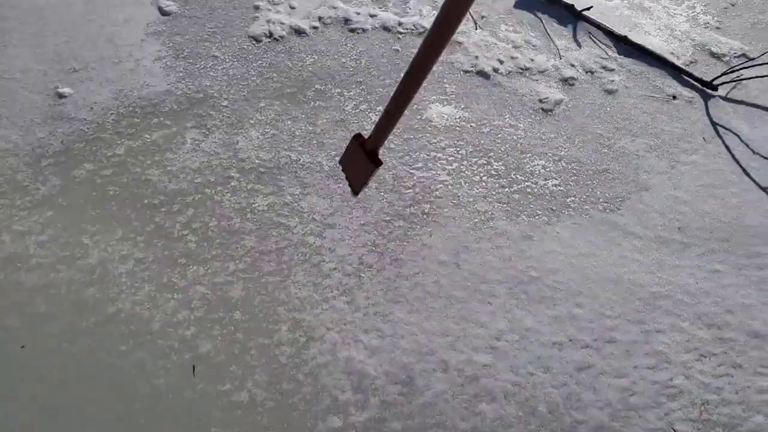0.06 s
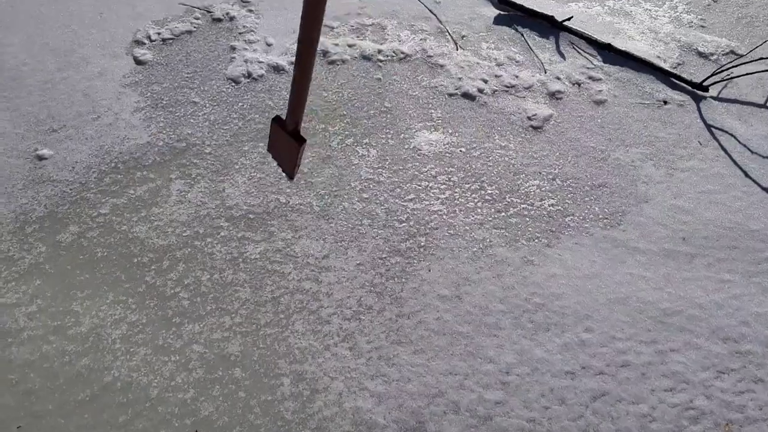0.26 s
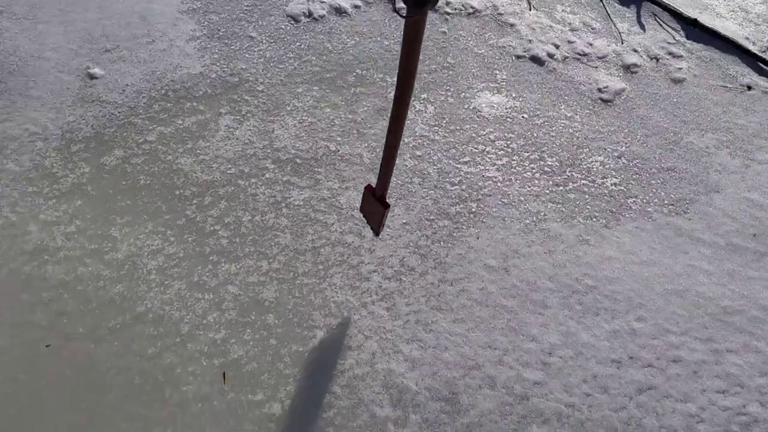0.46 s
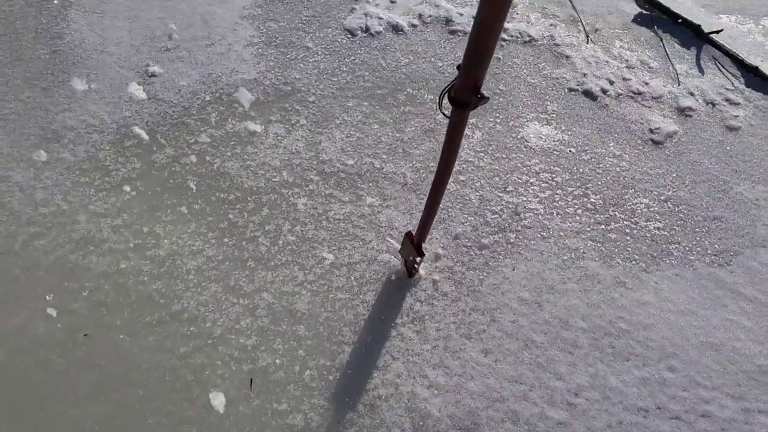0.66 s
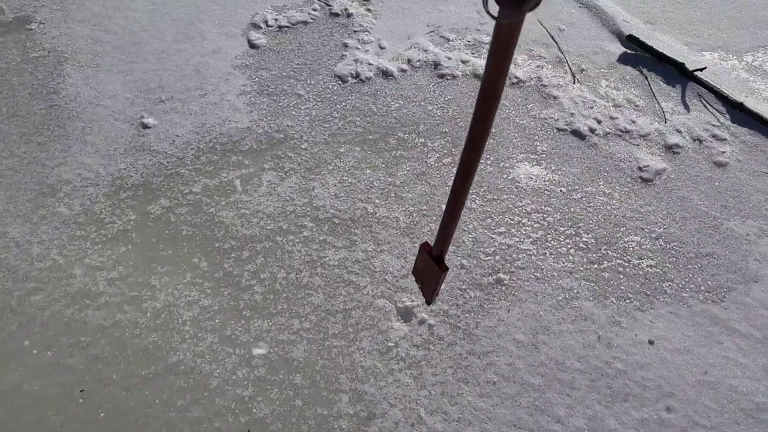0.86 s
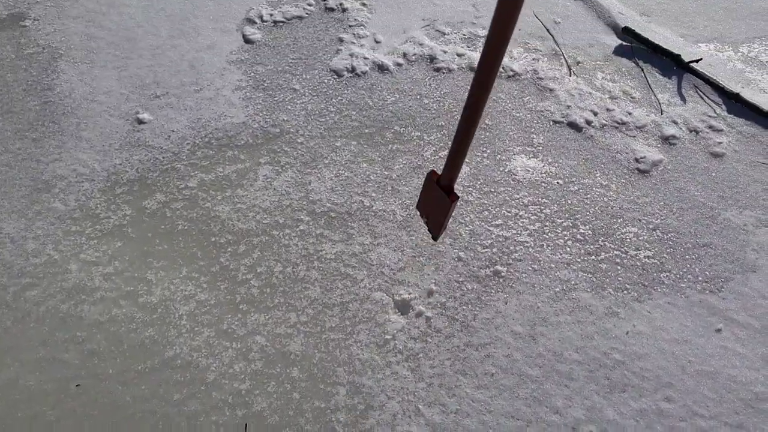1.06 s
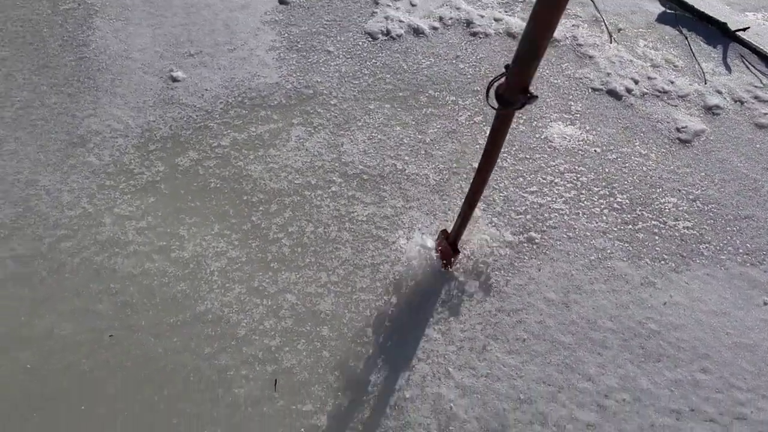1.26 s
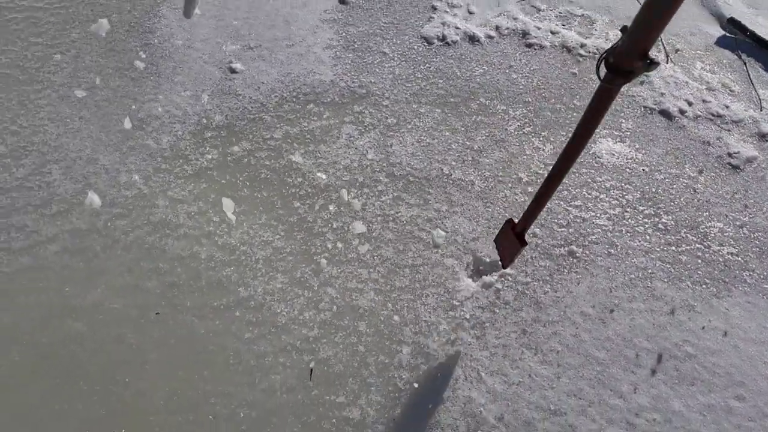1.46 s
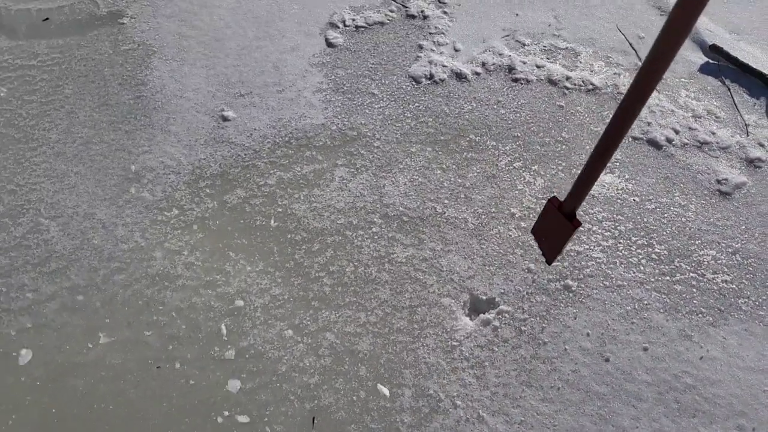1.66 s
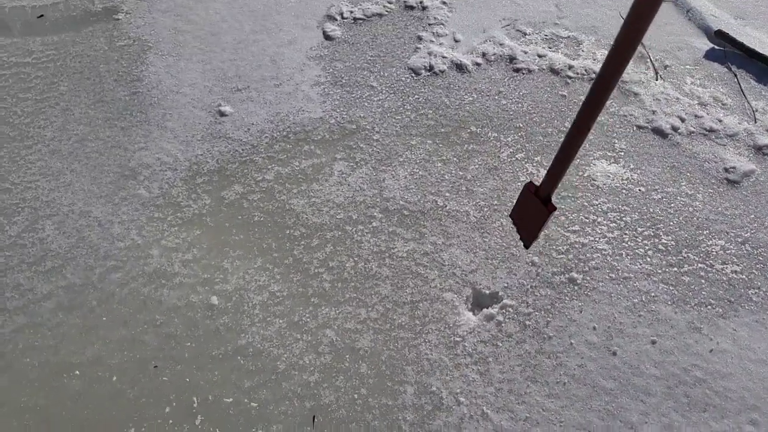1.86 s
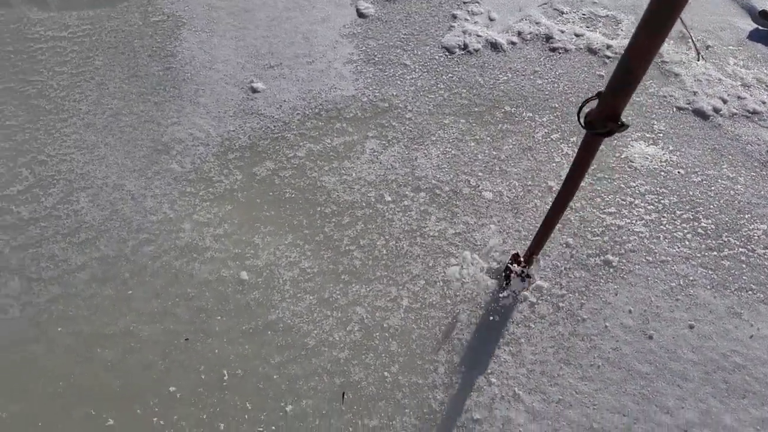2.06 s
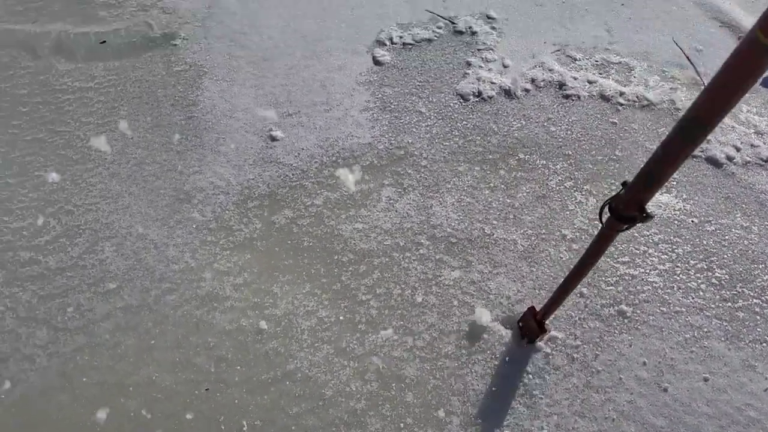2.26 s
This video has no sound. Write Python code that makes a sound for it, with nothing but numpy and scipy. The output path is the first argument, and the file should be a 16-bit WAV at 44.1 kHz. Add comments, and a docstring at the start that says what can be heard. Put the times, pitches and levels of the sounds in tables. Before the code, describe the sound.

Close outdoor chopping on ice: a brief muffled scuff and knocks, a bright clink, then three sharp metallic cracks with low thumps, each followed by crunches and glassy chips, with a distant engine droning faintly.

```python
"""A steel spud bar chops three times into solid lake ice, close to the microphone.
Each blow layers filtered grain bursts for the cracks, low sine thumps and decaying modes for the ice sheet,
and a fluttering modal ring for the bar. Chunks crunch as more grain bursts, chips clink as glassy modes and
fine crumbs patter as pulsed noise. A noise scuff and a few dull modal knocks come first; far off, an engine
of wavering harmonics drones over the filtered noise of the open air."""
import sys
import numpy as np
from scipy import signal
from scipy.fft import rfft, irfft, next_fast_len
from scipy.io import wavfile

SR = 44100
rng = np.random.default_rng(int(sys.argv[2]) if len(sys.argv) > 2 else 0)


def to_wav(s):
    """Save 16-bit WAV."""
    ch = np.atleast_2d(s).T  # columns
    pcm = np.round(np.clip(ch, -1, 1) * 32767)  # PCM
    wavfile.write(sys.argv[1], SR, pcm.astype(np.int16))


N = 101429

# In every table, levels are relative mix levels, t60 is the time to fall 60 dB,
# and pan is the level of left over right.

# Open-air rumble and hiss. Each row: frequency in Hz, density in dB per Hz.
AIR_COLOUR = [(25, 6), (60, 23.5), (140, 17.5), (250, 7.5), (600, 2.5), (1500, -5.5), (4000, -13.5),
              (9500, -22), (15000, -17)]
# Swell of the open air. Each row: time in seconds, level in dB.
AIR_LEVEL = [(0, -34), (.06, -53.5), (.2, -40), (.4, -42.5), (.75, -42), (.95, -49.5), (1.5, -43.5),
             (1.75, -48.5), (2.3, -50.5)]
# Cycle rate of the distant three-cylinder engine. Each row: time in seconds, rate in Hz.
ENGINE_RATE = [(0, 25), (.12, 26.5), (.4, 24.5), (.7, 19.5), (1, 19), (1.3, 22), (2.3, 19)]
# Swell of the engine. Each row: time in seconds, level in dB.
ENGINE_LEVEL = [(0, -39.5), (.25, -41), (.45, -48.5), (.75, -54.5), (.92, -49), (1.1, -45), (1.55, -49),
                (1.7, -57), (1.85, -45), (2.3, -55)]
# Engine harmonics. Each row: multiple of the cycle rate, mean level in dB.
ENGINE_HARMONICS = [(2, -23.5), (3, -2.5), (4, -23.5), (5, -13), (6, -8.5), (7, -26), (9, -36), (13, -48)]

# A scuff on snow. Each row: start in seconds, hold in seconds, level in dB.
SCUFFS = [(.030, 0.019, -30.5), (0.037, 0.0035, -20.5), (0.058, 0.055, -33.5), (0.15, 0.0059, -41)]
# Muffled tone of the scuff. Each row: frequency in Hz, density in dB per Hz.
SCUFF_COLOUR = [(60, 6), (330, -7.5), (530, 6), (880, -8), (1200, -22), (2100, -19.5), (4000, -36.5),
                (16000, -38)]
# Dull knocks close to the microphone. Each row: start in seconds, level in dB.
KNOCKS = [(0.2163, -7), (0.2305, -16), (0.2444, -6)]
# Modes of a knock before its low-pass. Each row: frequency in Hz, level in dB, t60 in seconds.
KNOCK_MODES = [(620, 0.73, 0.0093), (1085, 0.0065, 0.0078)]

# Small chips clink on the ice. Each row: start in seconds, level in dB, pitch factor set by size, pan in dB.
CHIPS = [(.299, -38.5, 0.5, 0), (.331, -48, .6, 0), (.360, -38, 0.77, -3), (0.4367, -11.5, 1, -3),
         (0.4587, -16.5, 1, -9.5), (0.4725, -31.5, 1, 20), (0.4882, -23, 1.8, -11), (0.513, -21.5, 1.5, 0),
         (.609, -36, 1.3, 0), (0.6696, -24, 1, 4), (1.0245, -23.5, 0.59, 3.5), (1.093, -28, 0.61, 0.5),
         (1.3865, -20.5, 1.04, -12.5), (1.498, -44, 1.5, 4), (1.5327, -44.5, 1.5, 20.5),
         (1.574, -47, 1.7, -1), (1.625, -50, 1.25, -6), (1.767, -44, 0.71, 10), (1.778, -32, 0.69, 3.5),
         (1.804, -42.5, 0.93, 5), (1.9444, -19.5, 1.25, -5), (2.081, -23, 2.1, -2), (2.165, -46.5, 1, 2),
         (2.212, -43.5, 0.84, 6)]
# Modes of a chip at pitch factor 1. Each row: frequency in Hz, level in dB, t60 in seconds.
CHIP_MODES = [(7210, -13.5, 0.046), (8160, -1, 0.016), (10340, -5, 0.023), (10370, -14, 0.0052),
              (12800, -6.5, 0.0067), (14300, -51.5, 0.021)]
# Modes of one thin shard. Each row: frequency in Hz, level in dB, t60 in seconds.
SHARD_MODES = [(2240, -14.5, 0.13), (4890, -18, 0.042), (5460, -44, .03), (7340, -11, 0.052),
               (9600, -19, .015), (10960, -20, 0.042), (14500, 7.5, 0.0097), (15400, -10, 0.012)]
# Crisp tick of a landing chip. Each row: frequency in Hz, density in dB per Hz.
TICK_COLOUR = [(200, -23.5), (1200, -8), (3000, -7.5), (4500, -5.5), (8000, -7), (16000, -1.5)]

# Three blows and one rebound ring the sheet and throw fine spray.
# Each row: time in seconds, sheet ring in dB, spray level in dB, spray t60 in seconds.
BLOWS = [(.527, -22, -39, 0.76), (1.256, -29, -32.5, 0.52), (1.386, -35.5, -43, 0.89),
         (1.973, -23.5, -42, 0.87)]
# Tone of the falling crumbs. Each row: frequency in Hz, density in dB per Hz.
SPRAY_COLOUR = [(100, -5), (500, 3), (1100, 8), (2500, 5), (5000, 0.5), (9500, -6.5), (13500, -3.5),
                (16000, -8)]
# The ice sheet gives under the blade. Each row: start in seconds, pitch in Hz, level in dB, t60 in seconds.
THUMPS = [(0.5306, 157, -6, 0.009), (0.538, 67, -14.5, 0.042), (1.256, 210, -20, 0.077),
          (1.272, 106, -29.5, 0.18), (1.9713, 97.2, -8, 0.033), (1.982, 61, -11.5, 0.046)]
# Modes of the ice sheet. Each row: frequency in Hz, level in dB, t60 in seconds.
SHEET_MODES = [(277, -1, .13), (323, 3.5, 0.03), (447, 1.5, 0.11), (468.8, -6.5, 0.22)]

# Loose chunks crunch and land. Each row: start in seconds, hold in seconds, level in dB,
# low mids, presence and treble in dB, resonance of the chunk in Hz, pan in dB.
CHUNKS = [(0.4275, 0.021, -40.5, -0.5, 0.0, 1, 3170, 2.5), (0.5945, 0.0021, -28.5, -4.5, -2, -10, 4500, -9),
          (0.614, 0.0037, -36, -11, -5, -4.0, 4130, -12), (0.6175, 0.001, -14.5, -14, -6, -8, 3450, 3),
          (0.637, 0.0014, -29.5, 11, -11, -8.0, 3000, 0), (0.649, 0.0082, -33.5, -36, -5, 7, 6370.0, 1.5),
          (0.699, 0.0034, -41, -3, -13, -14, 3280, 3), (0.781, 0.0017, -32, -10.5, -25, -12, 3140, -0.5),
          (0.792, 0.0079, -42, 4.5, -0.5, -2, 3900, -2), (1.115, 0.0025, -49.5, 8.5, 5, 20, 8100, -7.5),
          (1.1348, 0.0051, -25, -5.5, -0.5, 9, 5500, 0), (1.204, 0.0018, -42, 6, -3.0, 12, 2720, -4.0),
          (1.2379, 0.0036, -30.0, -6.0, 1, -1, 4730, 0), (1.2985, 0.0011, -35, 4, -12, -14, 2370, -8),
          (1.311, 0.0059, -17, -5.0, 1.0, 11.5, 4200, -2), (1.3161, 0.0011, -21.5, -14, -20, 4, 3600, -1),
          (1.338, 0.007, -29.5, 3, 14, 16.5, 4200, 4), (1.383, 0.012, -20.5, 1.5, -2, 15, 3250, -1.5),
          (1.392, 0.0031, -20.0, 9.5, 16.5, 1.0, 4800, -0.5),
          (1.407, 0.013, -30.5, -0.0, -1, -14, 4400, -4), (1.439, 0.014, -39.5, -1, 1.5, -31, 3340, -1.5),
          (1.507, 0.0028, -41.5, 7, -8, 9, 2270, -4.0), (1.5358, 0.0011, -30.5, 7.5, 3.5, -28, 4120, 7.5),
          (1.561, 0.01, -46.0, 8, -4.0, 2, 2320, -5), (1.835, 0.005, -31.5, 0.5, 3.5, 13.5, 5310, 0.5),
          (1.906, 0.027, -43, 9, -2, 7, 3150, 1), (2.006, 0.0017, -34, -11, -13, -12, 2300, -2.0),
          (2.025, 0.018, -41.5, 8, 14, 17, 3470, 16), (2.0318, 0.0046, -31.5, 5, 5.5, 13, 3600, -10),
          (2.057, 0.0024, -26, 2, 9, 5, 5160.0, 1.5), (2.113, 0.0018, -35.5, -2, 9.5, 26.5, 7000, -15.5),
          (2.119, 0.0015, -38, -32, 9, 18, 6900.0, 4), (2.13, 0.013, -52.5, -1, 14, 21, 7860, 6),
          (2.188, 0.0025, -45, -14, 0.0, 15.5, 3300, -1.0), (2.245, 0.0077, -48, -2.5, 2.5, 12, 7080, -3.5)]
# Base tone of a chunk. Each row: frequency in Hz, density in dB per Hz.
CHUNK_COLOUR = [(100, -13.5), (450, -2), (1400, -0.5), (2400, -1), (4500, 0.5), (7500, -3.5), (9500, -22.5),
                (13000, -16), (16000, -16.5)]
# The blade cracks the ice. Each row: start in seconds, hold in seconds, level in dB,
# low mids, presence and treble in dB, resonance of the broken piece in Hz, pan in dB.
CRACKS = [(0.52, 0.0051, -28, 4, -3, 4.5, 2360, -16), (0.5232, 0.0018, -10, -8.5, -6.5, -3, 2400, -1.5),
          (0.5422, 0.0033, -13.5, 8.5, 15.5, 9.5, 3000, 0.5),
          (0.546, 0.00071, -13.5, -7, -4, 3.0, 2950, -3), (0.56, 0.0033, -24, -0.5, 6, 0, 6250, 4.5),
          (1.25, 0.0013, -59, 19, -40, -38, 3430, -18), (1.2522, 0.0052, -12.5, -6, -1.5, -1, 3440, 3.5),
          (1.2585, 0.0074, -21.5, 13, -3, 17.5, 4630, -7.5),
          (1.2715, 0.0018, -12, 0.5, 5.5, 3.0, 6770, 0.5), (1.2767, 0.004, -34, 9, 7.5, 2, 7600, 11),
          (1.947, 0.012, -27.5, -14, -7.5, -3, 2030, 6.5), (1.9631, 0.0025, -16, -13, -9, -3, 1977, -6),
          (1.9684, 0.0022, -12.5, 1.5, -0.5, 4, 3060, 1), (1.983, 0.0045, -23.5, 19, 17.5, 16, 3130.0, -2)]
# Base tone of a crack. Each row: frequency in Hz, density in dB per Hz.
CRACK_COLOUR = [(100, 8), (400, -6.5), (1500, -3.5), (2300, -4.5), (3300, -6.5), (4500, -7), (7000, -7.5),
                (9500, -23), (13000, -14.5), (16000, -23)]
# Modes of the steel bar. Each row: frequency in Hz, level in dB, t60 in seconds.
BAR_MODES = [(631.3, -0.5, 0.4), (928, 10, 0.13), (1070, -4, 0.13), (1247, 4.5, 0.23), (1593, -4, 0.31),
             (1838, -7.5, 0.15), (2068, -0.5, .16), (2400, 2, 0.11), (2985, -15.5, 0.38), (2940, -14, 0.05),
             (3336, 4.5, 0.094), (3940, -7.5, 0.18), (4620, -12.5, 0.21), (5980, -9, .15), (6560, -11, .13),
             (6660, -10.5, .13)]
# Tone of the scatter through the ice. Each row: frequency in Hz, density in dB per Hz.
TAIL_COLOUR = [(60, 0.5), (250, 1), (1000, -4), (2500, 2.5), (6000, -8.5), (16000, -0.5)]

T = np.arange(N) / SR
SHORT = T[:8192]  # time axis of one event, in seconds
ATTACK_S, FRACTURE_ATTACK_S, KNOCK_ATTACK_S = 0.00044, 0.00055, 0.0018
CRACK_T60_S, CHUNK_T60_S, SCUFF_T60_S, CHIP_T60_S = 0.027, 0.0095, 0.068, 0.028
GRAIN_DB, SPRAY_GRAIN_DB = 7.5, 4  # spread of grain strengths
SHARD_S, SHARD_DB, CHIP_CRACK_DB = .2645, -16, -4.5
PIECE_DB, PIECE_WIDTH_HZ, FRACTURE_LIFT_DB = 10.5, 73, 0.5
BAR_DB, CHUNK_BAR_DB, TAIL_DB, TAIL_T60_S = -18.5, -13.5, -4, 0.078
CHATTER, CHATTER_HZ = 1.3, 110  # depth of the bar's flutter, random points per second
SPRAY_DELAY_S, CRUMBS_PER_S, CRUMB_SPREAD_DB = 0.011, 83, 4.5
CRUMB_S = 0.00064  # time constant of a crumb's power
PORT_LAG_S = .00009
APART_HZ, APART_SHARE, BASS_APART_SHARE = 1440, 0.7, 0.28  # stereo width of the grains
MODE_APART_HZ = 7000  # scales the phase spread of modes between the ports
KNOCK_TOP_HZ, RUMBLE_CUT_HZ, TOP_HZ = 1294, 30, 15900


def undb(db):
    """Decibels to gain."""
    return 10 ** (np.asarray(db) / 20)


def unit(x):
    """Scale to an rms of 1."""
    return x / np.sqrt(np.mean(x ** 2))


def fade(t, t60):
    """Exponential decay that starts at t = 0."""
    return np.exp(-np.log(1000) * np.maximum(t, 0) / t60)


def rise(attack):
    """Straight fade-in of a short event."""
    return np.minimum(SHORT / attack, 1)


def add(out, start, x, pan_db=0):
    """Mix a sound in at its time and side."""
    i = int(start * SR)
    sides = undb(np.array([[pan_db], [-pan_db]]) / 2)
    out[:, i:i + x.shape[-1]] += (x * sides)[:, :N - i]


def colour(x, points):
    """Causal minimum-phase filter of unit power through (Hz, dB) points."""
    n = 2 * next_fast_len(x.shape[-1])
    octave = np.log2(np.maximum(np.arange(n // 2 + 1) * SR / n, 1))
    hz, db = np.array(points).T
    gain = unit(undb(np.interp(octave, np.log2(hz), db)))
    # Folding the cepstrum forward puts the energy as early as possible.
    cepstrum = irfft(np.log(gain))
    cepstrum[1:n // 2] *= 2
    cepstrum[n // 2 + 1:] = 0
    return irfft(rfft(x, n) * np.exp(rfft(cepstrum)))[..., :x.shape[-1]]


def grains(size, spread_db):
    """Dense clicks of uneven strength at two ports: alike in the bass, partly unrelated in the treble."""
    strength = undb(spread_db * np.clip(rng.standard_normal(size), -3, 3))
    common, apart = rng.standard_normal((2, size)) * strength
    highpass = signal.butter(2, APART_HZ, "high", fs=SR, output="sos")
    apart = BASS_APART_SHARE * apart + APART_SHARE * signal.sosfilt(highpass, apart)
    return unit(np.array([common + apart, common - apart]))


def burst(length, t60, attack):
    """A run of tiny clicks that rises, holds until its length is up, then dies away."""
    return grains(len(SHORT), GRAIN_DB) * rise(attack) * fade(SHORT - length, t60)


def ring(modes, t, factor=1):
    """Decaying modes that start together; the higher ones differ more in phase between the ports."""
    offsets = rng.standard_normal((len(modes), 1, 1)) * np.array([[1], [-1]])
    total = 0
    for (hz, db, t60), offset in zip(modes, offsets):
        pitch = hz * factor
        phase = offset * min(hz / MODE_APART_HZ, .5)
        audible = pitch < SR / 2
        total = total + undb(db) * audible * fade(t, t60) * np.cos(2 * np.pi * pitch * t + phase)
    return total


def through(x, response):
    """Pass a sound through a response of unit energy."""
    response = unit(response) / np.sqrt(response.shape[-1])
    return signal.fftconvolve(x, response, axes=-1)[:, :N]


def curve(rows):
    """Straight lines through (seconds, value) points."""
    return np.interp(T, *np.array(rows).T)


def waver():
    """Slow random drift."""
    return np.interp(T, np.linspace(0, T[-1], 40), rng.standard_normal(40))


def far_engine():
    """Harmonics of the cycle rate, each wavering a little in level and phase, drone unevenly."""
    phase = 2 * np.pi * np.cumsum(curve(ENGINE_RATE)) / SR
    engine = np.zeros(N)
    for multiple, db in ENGINE_HARMONICS:
        level = undb(db + 0.83 * waver())
        engine += level * np.sin(round(multiple) * phase + 0.1 * waver())
    return unit(engine) * undb(curve(ENGINE_LEVEL))


def open_air():
    """Filtered noise makes low rumble and faint hiss that swell and sink."""
    return colour(grains(N, 0), AIR_COLOUR) * undb(curve(AIR_LEVEL))


def handling():
    """A muffled scuff of filtered grains, and knocks of short modes dulled by a steep low-pass."""
    out = np.zeros((2, N))
    for start, length, db in SCUFFS:
        scuff = colour(burst(length, SCUFF_T60_S, ATTACK_S), SCUFF_COLOUR)
        add(out, start, undb(db) * scuff)
    knock = rise(KNOCK_ATTACK_S) * ring(KNOCK_MODES, SHORT)
    knock = signal.sosfilt(signal.butter(9, KNOCK_TOP_HZ, fs=SR, output="sos"), knock)
    for start, db in KNOCKS:
        add(out, start, undb(db) * knock)
    return out


def clink(modes, factor=1):
    """A glassy ring of modes topped with a crisp tick of grains."""
    tick = colour(burst(0, CHIP_T60_S, ATTACK_S), TICK_COLOUR)
    return rise(ATTACK_S) * ring(modes, SHORT, factor) + undb(CHIP_CRACK_DB) * tick


def chips():
    """One thin shard rings, and chips land with a pitch set by their size."""
    out = np.zeros((2, N))
    add(out, SHARD_S, undb(SHARD_DB) * clink(SHARD_MODES))
    for start, db, factor, pan in CHIPS:
        add(out, start, undb(db) * clink(CHIP_MODES, factor), pan)
    return out


def spray():
    """Fine crumbs, noise pulsed by random landings, patter down after each blow and fade."""
    out = np.zeros((2, N))
    for start, _, db, t60 in BLOWS:
        landed = rng.random(N) < CRUMBS_PER_S / SR
        power = undb(CRUMB_SPREAD_DB * rng.standard_normal(N).clip(-2, 2)) ** 2
        pulses = signal.lfilter([1], [1, -np.exp(-1 / (CRUMB_S * SR))], landed * power)
        patter = unit(np.sqrt(pulses) + 0.22)  # a steady floor between the crumbs
        crumbs = grains(N, SPRAY_GRAIN_DB) * patter * fade(T, t60)
        add(out, start + SPRAY_DELAY_S, undb(db) * colour(crumbs, SPRAY_COLOUR))
    return out


def ice_sheet():
    """A heavily damped low swing that builds for just over half a cycle, and a short hollow ring."""
    out = np.zeros((2, N))
    for start, hz, db, t60 in THUMPS:
        peak_s = 0.59 / hz
        swing = np.sin(2 * np.pi * hz * SHORT) * rise(peak_s) * fade(SHORT - peak_s, t60)
        add(out, start, undb(db) * swing)
    for start, db, _, _ in BLOWS:
        add(out, start, undb(db) * rise(0.0023) * ring(SHEET_MODES, SHORT))
    return out


def fractures(rows, spectrum, t60):
    """Bursts of breaking ice, each with its own tone and the resonance of its piece."""
    out = np.zeros((2, N))
    hz, base = np.array(spectrum).T
    for start, length, db, low, presence, treble, piece_hz, pan in rows:
        shade = np.interp(hz, [1400, 2200, 3500, 5000, 7500, 9500],
                          [low, 0, 0, presence, presence, treble])
        x = colour(burst(length, t60, FRACTURE_ATTACK_S), np.c_[hz, base + shade])
        piece = signal.lfilter(*signal.iirpeak(piece_hz, piece_hz / PIECE_WIDTH_HZ, fs=SR), x)
        resonant = x + (undb(PIECE_DB) - 1) * piece
        add(out, start, undb(db + FRACTURE_LIFT_DB) * resonant, pan)
    return out


def bar_response():
    """The bar chatters against the ice, so each mode flutters as it dies away."""
    t = T[:N // 4]
    total = 0
    for mode in BAR_MODES:
        flutter = 1 + CHATTER * np.interp(t * CHATTER_HZ, np.arange(400), rng.standard_normal(400))
        total = total + ring([mode], t) * flutter
    return total


def chopping():
    """Cracks and chunks ring the bar and scatter briefly through the ice."""
    cracks = fractures(CRACKS, CRACK_COLOUR, CRACK_T60_S)
    chunks = fractures(CHUNKS, CHUNK_COLOUR, CHUNK_T60_S)
    bar = through(undb(BAR_DB) * cracks + undb(CHUNK_BAR_DB) * chunks, bar_response())
    scatter = colour(grains(len(SHORT), 0) * fade(SHORT, TAIL_T60_S), TAIL_COLOUR)
    tail = through(cracks + chunks, scatter)
    return cracks + chunks + bar + undb(TAIL_DB) * tail


def scene():
    """The ice and bar reach the left port a moment after the right; the other sounds have no such lag."""
    left, right = chips() + spray() + ice_sheet() + chopping()
    late_left = np.roll(left, int(round(PORT_LAG_S * SR)))
    return far_engine() + open_air() + handling() + np.array([late_left, right])


def record(dry):
    """The recorder thins the deepest bass, clips the highest peaks and cuts the top."""
    thinned = signal.sosfilt(signal.butter(2, RUMBLE_CUT_HZ, "high", fs=SR, output="sos"), dry)
    clipped = np.clip(thinned, -.95, .95)
    return signal.sosfilt(signal.ellip(10, .2, 80, TOP_HZ, fs=SR, output="sos"), clipped)


dry = scene()
out = record(dry)
to_wav(out)
```